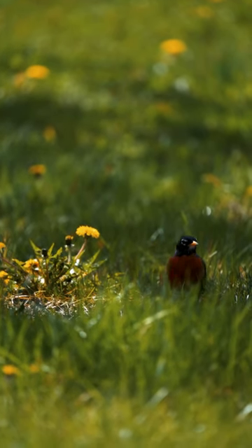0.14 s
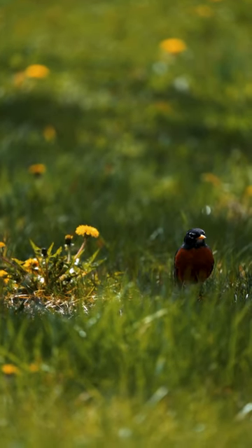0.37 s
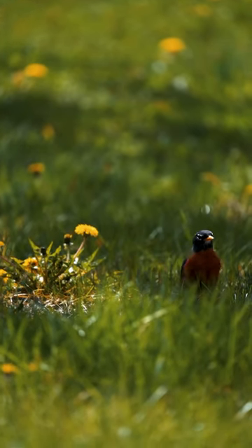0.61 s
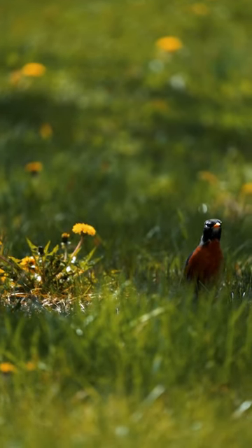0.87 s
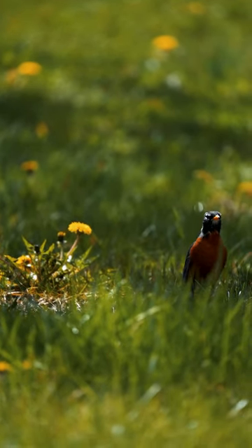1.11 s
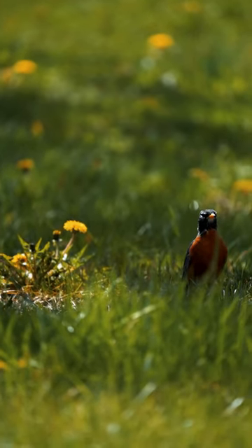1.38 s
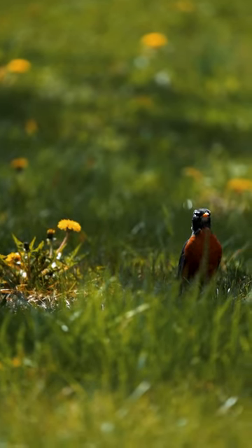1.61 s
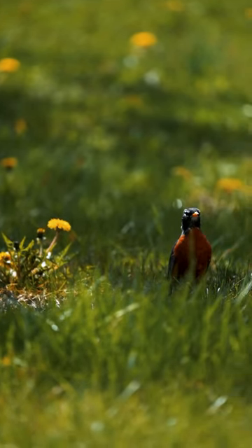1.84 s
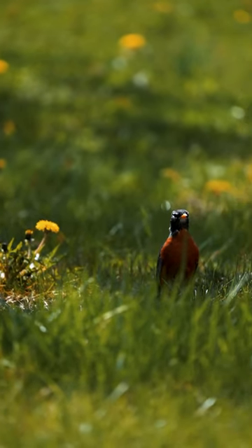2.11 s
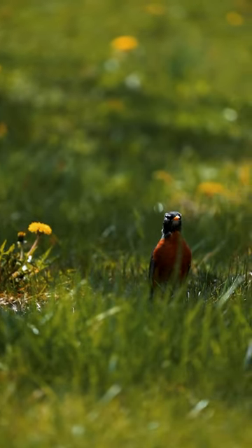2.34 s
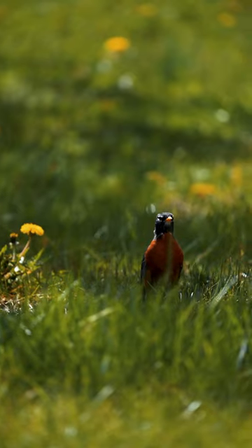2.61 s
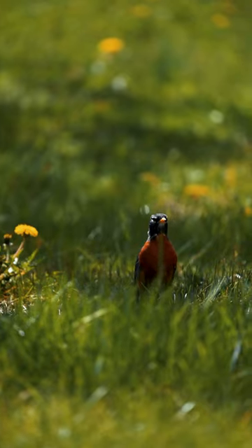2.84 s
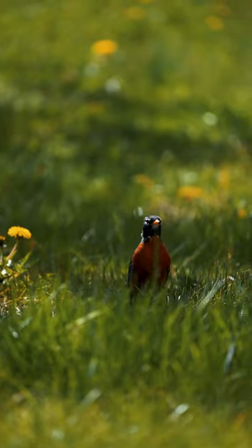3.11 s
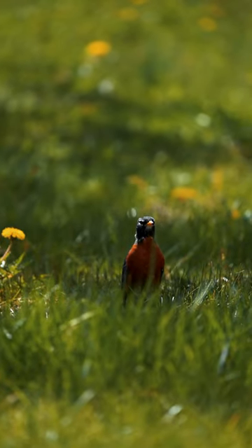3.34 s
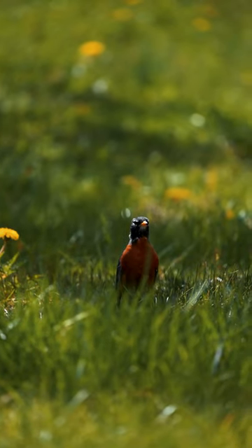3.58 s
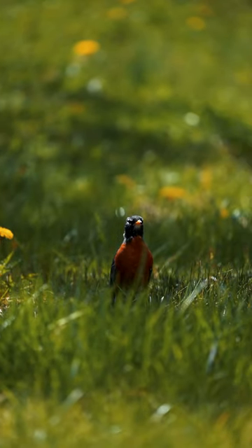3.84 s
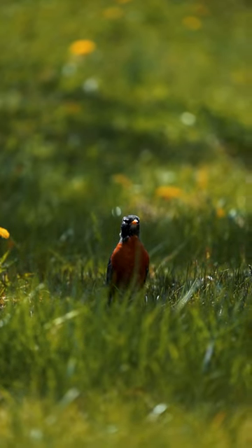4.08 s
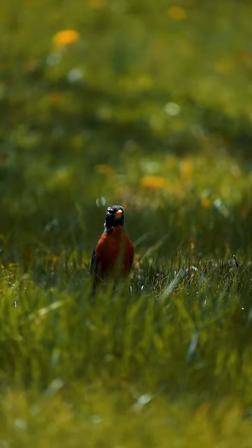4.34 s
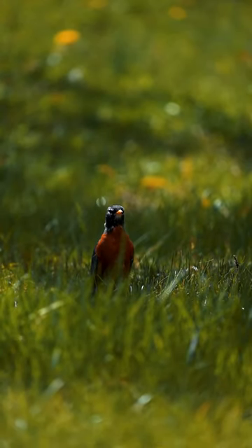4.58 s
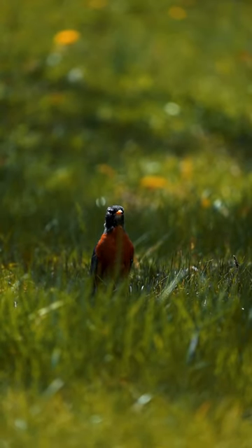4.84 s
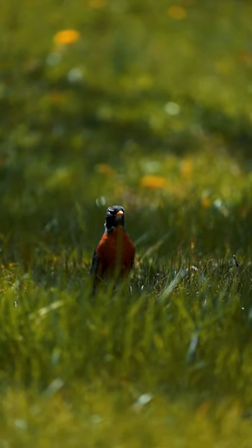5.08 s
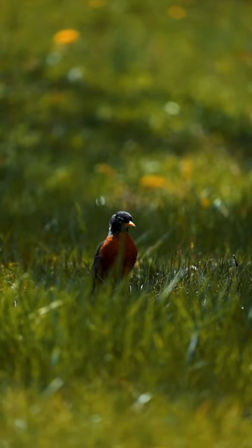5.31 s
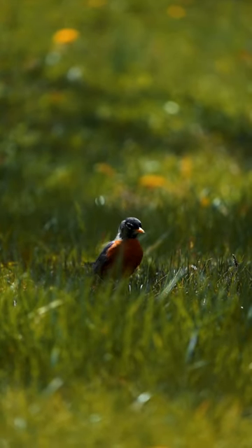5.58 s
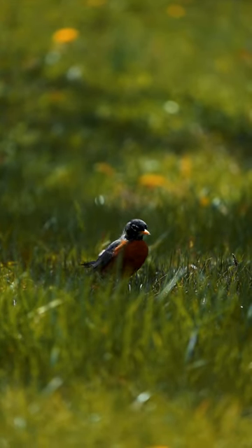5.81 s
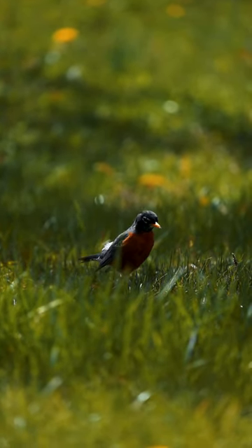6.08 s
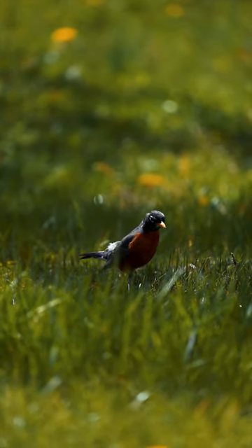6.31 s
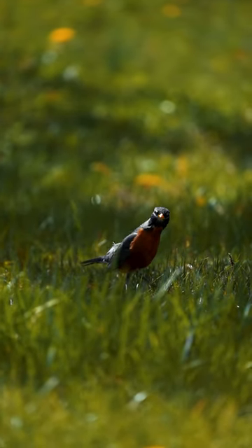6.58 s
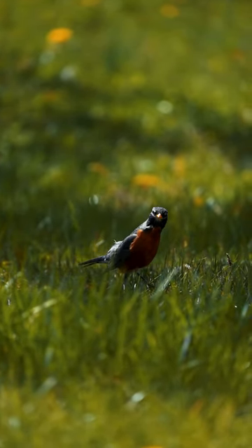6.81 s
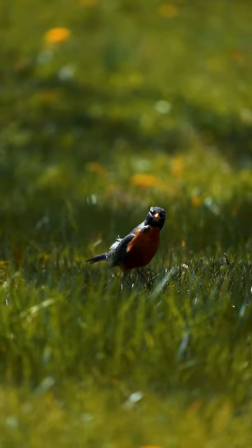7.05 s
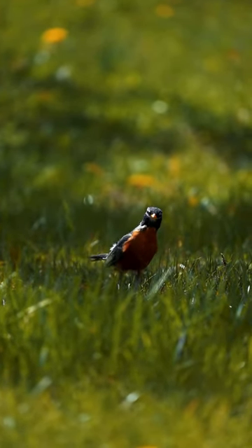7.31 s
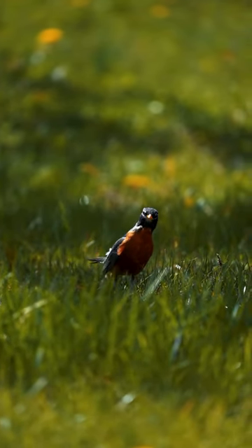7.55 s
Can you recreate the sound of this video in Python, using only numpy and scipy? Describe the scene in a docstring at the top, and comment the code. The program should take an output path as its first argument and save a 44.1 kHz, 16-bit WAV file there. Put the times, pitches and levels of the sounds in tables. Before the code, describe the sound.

Several songbirds chirp, trill and whistle over a quiet lawn, a bright three-part chirp repeating between short thrush-like phrases, then thinning to sparse calls.

```python
"""Songbirds over a lawn, led by a thrush-like singer: arches of pitch shaped by a beak resonance, and trills.
A sparrow-like bird repeats a three-part chirp, near-sine tones in a rasp of resonant noise. Other calls
are slurs, glides, rattling pulses, chopped-noise buzzes, rough burrs and far twitter of random glides.
Trees and walls throw short echoes (sparse random reflections) over rumble and hiss, a hum and a drone."""
import sys
import numpy as np
from scipy import signal
from scipy.io import wavfile
from scipy.ndimage import uniform_filter1d

SR = 44100
rng = np.random.default_rng(int(sys.argv[2]) if len(sys.argv) > 2 else 0)


def wrap_up_sound(samples):
    """Save the sound to the file named by the first command line argument, as 16-bit audio."""
    columns = np.atleast_2d(samples).T
    # keep every value between -1 and 1, then stretch to whole-number steps
    tamed = np.clip(columns, -1, 1)
    steps = np.round(tamed * 32767).astype(np.int16)
    wavfile.write(sys.argv[1], SR, steps)


def attenuation_scalar(level_db):
    """Turn a level in dB into a linear amplitude multiplier (20 dB per decade)."""
    decades = np.asarray(level_db, float) / 20
    return 10 ** decades


N = 338688
THROAT_HZ = 3680  # resonance shared by trills, rattles and the sparrow


def evened(x):
    """Scales to rms 1."""
    return x / np.sqrt(np.mean(x ** 2) + 1e-20)


def wander(count, smooth):
    """Noise of rms 1, averaged over a number of samples."""
    return evened(uniform_filter1d(rng.standard_normal(count), size=smooth))


def add(mix, s, sound):
    """Mixes a sound in at s seconds."""
    part = mix[max(round(s * SR), 0):][:len(sound)]
    part += sound[:len(part)]


def curves(rows):
    """Reads a table at every sample, corners rounded."""
    s, *columns = np.transpose(rows)
    t = np.arange(s[0], s[-1], 1 / SR)
    return [uniform_filter1d(np.interp(t, s, c), size=90, mode="nearest") for c in columns]


def resonate(x, hz, width_hz):
    """A resonance of gain 1, applied twice for steep skirts."""
    turn = np.exp(2j * np.pi * hz * np.arange(len(x)) / SR)
    r = np.exp(-np.pi * abs(width_hz) / SR)
    # shift the resonance to 0 Hz, smooth with a double pole, shift back
    return 2 * (turn * signal.lfilter([(1 - r) ** 2], [1, -2 * r, r * r], x / turn)).real


def syrinx(hz, db, overtones_db=(-40,), rough=0.026):
    """A near sine with soft ends, a few overtones and unsteady level and pitch (rough: rms share of pitch)."""
    count = len(hz)
    phase = 2 * np.pi * np.cumsum(hz * (1 + rough * wander(count, 40))) / SR
    tone = np.sin(phase) + sum(attenuation_scalar(o) * np.sin((k + 2) * phase) for k, o in enumerate(overtones_db))
    edge = np.minimum(np.arange(count), np.arange(count)[::-1]) / (0.0035 * SR)
    flutter_db = 45 * rough * wander(count, 260)
    return attenuation_scalar(db + flutter_db) * tone * np.minimum(edge, 1)


def sing(mix, shape, events, **voice):
    """Repeats one syllable shape, each time at its own level and pitch factor (1 if absent)."""
    hz, db = curves(shape)
    for row in events:
        s, level_db, factor = (*row, 1)[:3]
        add(mix, s, syrinx(hz * factor, db + level_db, **voice))


def thrush(mix):
    """Arches of pitch, loudest where the pitch meets the beak resonance; wide slow rises start softly."""
    # (time of top [s], rise [s], fall [s], foot pitch [Hz], top pitch [Hz], level at beak resonance [dB])
    arch_notes = [(.862, 0.032, 0.0027, 1700, 1900, -45), (1.018, 0.016, 0.015, 1892, 3040, -36),
                  (1.095, 0.021, 0.0078, 1910, 2300, -36.5), (1.222, 0.02, 0.0033, 1964, 2270, -46),
                  (3.172, 0.0053, 0.023, 1550, 2830, -31.5), (3.764, 0.0066, 0.016, 1590, 2200, -34),
                  (3.797, 0.0065, 0.014, 1736, 2236, -33), (3.825, 0.017, 0.012, 1776, 2120, -33),
                  (4.122, 0.018, 0.0184, 1430, 2028, -35.5), (4.171, 0.022, 0.017, 1470, 2075, -33),
                  (4.272, 0.024, 0.012, 1490, 2054, -32.5), (4.313, .011, 0.02, 1450, 2186, -35)]
    beak_hz, under_db_per_khz, over_db_per_khz = 2200, 34, 21
    for s, rise_s, fall_s, foot_hz, top_hz, level_db in arch_notes:
        u = np.r_[np.linspace(-1, 0, round(rise_s * SR)), np.linspace(0, 1, round(fall_s * SR))]
        hz = foot_hz + (top_hz - foot_hz) * np.cos(np.pi / 2 * u)
        loss_db = np.maximum(under_db_per_khz * (beak_hz - hz), over_db_per_khz * (hz - beak_hz)) / 1000
        onset_db = (top_hz - foot_hz) * rise_s * 0.52 * np.minimum(u, 0)
        add(mix, s - rise_s, syrinx(hz, level_db - loss_db + onset_db, (-50,), rough=0.0017))


def trill(stroke, voice, rows):
    """The pitch swings round a gliding middle; the octave is loud only where it meets the throat resonance."""
    rise, rough, point = stroke
    octave_db, throb_db, loudest, done = voice
    throat_width_hz = 290
    middle_hz, swing_hz, db, rate = curves(rows)
    u = (done + np.cumsum(rate) / SR) % 1
    # a quick rise is followed by a steep first drop
    ramp = np.where(u < 1 - rise, (u / (1 - rise)) ** (.5 + rise), (1 - u) / rise)
    hz = middle_hz + swing_hz * (2 * abs(np.cos(np.pi / 2 * ramp)) ** (2 * point) - 1)
    weak_db = np.maximum(2000 - hz, 0) / 30  # the fundamental fades below 2 kHz
    throat_db = octave_db - 10 * np.log10(1 + ((2 * hz - THROAT_HZ) / throat_width_hz) ** 2)
    swell_db = throb_db * (np.cos(2 * np.pi * (u - loudest)) - 1)
    return syrinx(hz, db - weak_db + swell_db, (throat_db + weak_db,), rough)


def trills(mix):
    """Fast repeated pitch swings whose level throbs once a swing."""
    # ((octave level [dB], half throb depth [dB], loudest point in swing [0-1], swings done at start),
    #  rows (time [s], middle pitch [Hz], swing each way [Hz], level [dB], rate [swings/s]));
    # the pitch tops at whole numbers of swings
    trill_table = [ ((0, 3.2, .1, -.17), [(1.33, 2230, 100, -54, 20.2), (1.44, 2340, 295, -56, 20.2),
                   (1.562, 2120, 340, -58, 20.2)]), ((-27, 2.8, .72, -.5), [(1.788, 2870, 200, -53, 24),
                   (2.0, 2530, 233, -53, 18), (2.04, 2494, 302, -47.5, 16)]), ((11.6, 2.1, .41, -.1),
                   [(2.148, 2130, 450, -57, 28), (2.269, 2130, 420, -55.5, 23.8),
                   (2.382, 2070, 420, -60.5, 21.5)]), ((-48, 4.2, .96, -.45), [(3.432, 3350, 680, -65, 90),
                   (3.449, 3090, 380, -42, 80), (3.49, 2693, 240, -34.5, 66),
                   (3.555, 2270, 180, -34.5, 59.5), (3.596, 2063, 66, -33, 59), (3.63, 2052, 12, -37.5, 30),
                   (3.642, 2070, 10, -53, 30)]), ((-38, 2, .32, -.42), [(4.409, 4300, 1370, -57, 78.5),
                   (4.445, 4250, 930, -47, 78.5), (4.468, 4770, 686, -60, 78.5)])]
    # per trill: (rising share of a swing [0-1], pitch roughness [rms share], pointedness of tops [1 up])
    stroke_table = [(.55, .01, 1.6), (.45, .035, 1), (.2, .022, 1.3), (.72, .006, 1), (.5, .01, 1)]
    for stroke, (voice, rows) in zip(stroke_table, trill_table):
        add(mix, rows[0][0], trill(stroke, voice, rows))


def slurs(mix):
    """Longer slurred whistles: near sines along a drawn pitch and level."""
    slur_tables = [
        [(1.615, 3260, -62), (1.654, 3110, -58), (1.687, 3390, -58), (1.712, 3660, -52.5), (1.762, 3440, -63.5)],
        [(3.045, 1590, -65.5), (3.094, 1980, -41.5), (3.108, 2695, -53), (3.123, 2255, -33), (3.147, 1590, -60)],
        [(3.902, 2770, -51), (3.918, 2864, -38.5), (3.943, 2306, -36), (3.97, 2953, -37.5), (4.001, 2076, -39),
         (4.037, 1840, -60)],
        [(2.47, 2950, -67), (2.502, 3800, -51), (2.509, 4250, -44.5), (2.525, 4900, -47), (2.532, 3850, -48),
         (2.55, 3650, -49)],
        [(2.756, 2400, -55), (2.776, 3350, -45.5), (2.796, 4250, -53)],
    ]  # one per whistle: (time [s], pitch [Hz], level [dB])
    slur_rough = [.022, .002, .002, .012, .006]  # per whistle: (pitch roughness [rms share]); the faint far one wavers
    for rows, rough in zip(slur_tables, slur_rough):
        add(mix, rows[0][0], syrinx(*curves(rows), overtones_db=(-48,), rough=rough))


def glides(mix):
    """Straight slides of pitch, a little softer at both ends; some swell to their end."""
    # both: (time [s], length [s], from pitch [Hz], to pitch [Hz], level [dB]); for rises, the level swelled to
    held_notes = [(2.553, 0.024, 5300, 2760, -42.5), (2.625, 0.033, 3100, 4460, -43.5),
                  (2.752, 0.052, 2900, 4900, -60), (3.259, 0.11, 1884, 1930, -41),
                  (3.708, 0.046, 1665, 1740, -51.5), (3.78, 0.065, 3870, 3700, -60.5),
                  (4.096, 0.011, 1910, 2860, -57), (4.187, .02, 3050, 1930, -61.5),
                  (5.375, 0.038, 3870, 3860, -57.5)]
    rising_notes = [(2.46, 0.089, 1794, 2980, -37.5)]
    for table, swell_db_per_s in ((held_notes, 0), (rising_notes, 415)):
        for s, length_s, from_hz, to_hz, level_db in table:
            left_s = np.arange(length_s, 0, -1 / SR)
            hz = to_hz + (from_hz - to_hz) * left_s / length_s
            ends_db = 3 * (2 * left_s / length_s - 1) ** 2
            add(mix, s, syrinx(hz, level_db - swell_db_per_s * left_s - ends_db, rough=0.0064))


def hoarse(hz, db):
    """A sparrow's tone; its overtones come out most where the pitch meets the throat resonance."""
    low_db = -abs(hz - THROAT_HZ) / 40
    return syrinx(hz, db, (low_db / 2 - 27, low_db / 7 - 27, low_db - 42), rough=0.011)


def sparrow_parts(chirps):
    """Lists (shape, time, level, pitch factor) of the soft calls and of each chirp's two arches and hook."""
    # shapes: (time [s], pitch before its factor [Hz], level relative to the event [dB])
    soft_shape, arch_shape, hook_shape = [(0, 3500, -22), (.012, 4500, -5.5), (.025, 4750, -4.5),
                                          (.029, 3900, -6), (.04, 3780, -4), (.062, 3750, -19),
                                          (.073, 3250, -13.5), (.095, 3900, -3.5), (.115, 3120, -9)], [(0, 3680, -8.5), (.008, 4752, 5), (.021, 4857, 2),
                                                        (0.03, 3810, 0.5), (.043, 3675, -6),
                                                        (0.049, 3350, -22)], [(0.0, 3630, -4), (0.012, 3730, -2),
                                                                      (0.024, 4300, 8.5), (0.029, 3705, 4),
                                                                      (0.034, 3620, 0.5),
                                                                      (0.044, 2900, -10.5)]
    soft_events = [(0.613, -47, 0.99), (1.193, -57.5, 1.05), (5.536, -44, 0.98), (7.605, -48, 0.95)]  # (time [s], level [dB], pitch factor)
    second_db, second_lift, hook_lag_s, hook_db = 0.6, 0.0225, .062, -3
    parts = [(soft_shape, *row) for row in soft_events]
    for s, gap_s, db, factor, hook_factor, slant in chirps:
        # the arch top lies between rows 1 and 2: tilt it
        arch = [(t, hz * (1 + slant * ((k == 2) - (k == 1))), top_db)
                for k, (t, hz, top_db) in enumerate(arch_shape)]
        parts += [(arch, s, db, factor),
                  (arch, s + gap_s, db + second_db, factor + second_lift),
                  (hook_shape, s + gap_s + hook_lag_s, db + hook_db, hook_factor)]
    return parts


def sparrow():
    """Grace note, two arches and a hook, or a softer call, in a ragged breathy rasp that starts before the tone."""
    # (time [s], lag of second arch [s], level [dB], pitch factor, hook pitch factor, slant of arch tops [share])
    chirp_events = [(.835, 0.063, -42, 1.006, 1.054, -0.003), (2.53, 0.059, -42, 1.026, 1.01, 0.069),
                    (3.552, 0.069, -43.5, 1.038, 1.07, 0.0092), (5.113, 0.066, -43, 1.028, 1.144, 0.05),
                    (5.784, 0.067, -43, 1.064, 0.99, 0.027), (6.212, 0.058, -43, 1.03, 1.02, 0.017)]
    grace_shape = [(0, 3710, -24), (0.014, 4920, 1)]  # (time [s], pitch [Hz], level relative to the chirp [dB])
    rasp_bands = [(4300, 1200, -16.5, 0.018), (11150, 2400, -29.5, 0.012)]  # (centre [Hz], width [Hz], level relative to the breath [dB], lag [s])
    out, breath = np.zeros(N), np.zeros(N)
    for shape, s, level_db, factor in sparrow_parts(chirp_events):
        hz, db = curves(shape)
        add(out, s, hoarse(hz * factor, db + level_db))
        add(breath, s - .075, attenuation_scalar(level_db) * np.hanning(len(hz) + round(.1 * SR)))
    sing(out, grace_shape, [(s - .013, db) for s, _, db, *_ in chirp_events])
    for hz, width_hz, db, lag_s in rasp_bands:
        ragged_db = 5 * wander(N, 900)  # each band flares on its own
        hiss = evened(resonate(resonate(rng.standard_normal(N), hz, width_hz), hz, width_hz))
        late_breath = np.r_[np.zeros(round(abs(lag_s) * SR)), breath][:N]
        out += late_breath * attenuation_scalar(db) * evened(attenuation_scalar(ragged_db) * hiss)
    squabble(out)
    return out + attenuation_scalar(-20) * breath * evened(scratches(400, 3600, 3800, .04))


def squabble(mix):
    """A jumble of short scratchy calls under one swell."""
    squabble_row = (.6, 0.29, -61)  # (time [s], length [s], level before the swell window [dB])
    s, length_s, db = squabble_row
    jumble = scratches(300, 2100, 4800, .02)[:round(length_s * SR)]
    add(mix, s, attenuation_scalar(db) * evened(jumble) * np.hanning(len(jumble)) ** .5)


def rattles(mix):
    """Slowing, uneven pulse trains; overtones 5-9 show as a stack of falling lines round the throat."""
    start_s, gap_s, count, level_db = 1.337, .0525, 5, -54
    for k in range(count):
        left = np.linspace(1, 0, round(.034 * SR))
        uneven = 1 + .008 * wander(len(left), 60)
        turns = np.cumsum(rng.uniform(.94, 1.06) * (440 + 120 * left ** 3) * uneven) / SR
        pulses = sum(np.cos(2 * np.pi * h * turns) for h in range(5, 10))
        sound = evened(resonate(pulses, THROAT_HZ, 670) + 0.41 * pulses)
        sound = sound * signal.windows.tukey(len(turns), .6)
        add(mix, start_s + k * gap_s, attenuation_scalar(level_db + 2 * rng.standard_normal()) * sound)


def buzzes(mix):
    """Noise in a narrow resonance, chopped by a throb."""
    # (time [s], length [s], centre [Hz], rms before end tapers [dB], rate [throbs/s])
    buzz_table = [(0.856, 0.054, 2210, -51, 70), (1.223, 0.052, 5500, -67, 69),
                  (2.748, 0.075, 710, -69, 24), (2.099, 0.12, 2640, -58, 61),
                  (2.349, 0.13, 2700, -60.5, 51), (2.884, 0.61, 2590, -63, 67),
                  (5.578, 0.064, 5500, -60.5, 92)]
    for s, length_s, hz, db, rate in buzz_table:
        t = np.arange(round(length_s * SR)) / SR
        chop = .35 + np.sin(np.pi * rate * t) ** 2
        noise = evened(resonate(rng.standard_normal(len(t)), hz, 370) * chop)
        add(mix, s, attenuation_scalar(db) * noise * signal.windows.tukey(len(t), .3))


def burrs(mix):
    """Two rough tones at once, each throbbing fast and unevenly."""
    burr_table = [(.02, 0.032, -59, -67), (.049, 0.024, -57, -64), (.093, 0.02, -58, -66),
                  (.119, 0.03, -58, -62), (1.023, 0.041, -49, -61), (1.101, 0.047, -64, -50),
                  (1.219, 0.038, -55.5, -54)]  # (time [s], length [s], rms of low tone [dB], rms of high tone [dB])
    burr_hz = (2240, 2830)  # (low tone [Hz], high tone [Hz])
    throbs_per_s = 134
    for s, length_s, *levels_db in burr_table:
        for hz, db in zip(burr_hz, levels_db):
            t = np.arange(round(length_s * SR)) / SR
            beats = throbs_per_s * t + .3 * wander(len(t), 300)
            tone = syrinx(hz + 0 * t, 0, rough=0.052)
            add(mix, s, attenuation_scalar(db) * evened(tone * (.6 + np.sin(np.pi * beats) ** 2)))


def peeps(mix):
    """Short near sines of level pitch."""
    peep_table = [(.535, 2310, -64.5), (.578, 2380, -66.5), (0.626, 2420, -69), (.733, 5050, -62),
                  (.578, 5000, -62), (2.843, 5090, -58), (2.883, 5050, -56), (6.95, 2105, -68),
                  (7.37, 2180, -66.5)]  # (time [s], pitch [Hz], level [dB])
    for s, hz, db in peep_table:
        add(mix, s, syrinx(np.full(round(0.026 * SR), hz), db, rough=0.017))


def small_calls(mix):
    """Tsips, flicks and falling calls: near sines along fixed pitch shapes."""
    # shapes: (time [s], pitch before any factor [Hz], level relative to the event [dB])
    tsip_shape, flick_shape, drop_shape = [(0.0, 4170, 8), (0.004, 3210, -3), (0.022, 3520, 1),
                                           (0.039, 2610, -2.5)], [(0, 2520, 6), (.016, 3200, -9)], [(0, 6930, -13), (0.016, 4920, -8),
                                                                        (.065, 4730, -3.5)]
    # events: (time [s], level [dB])
    tsip_events, flick_events, drop_events = [(.04, -58.5), (4.215, -65.5), (4.33, -63.5), (7.377, -62.5),
                                              (7.477, -62), (7.579, -61)], [(.441, -63), (0.495, -64), (.522, -62),
                                                             (0.567, -61)], [(5.99, -61.5), (6.695, -57.5)]
    step_s, step_factor, step_db = 0.057, 0.83, -4  # a lower, fainter drop follows each
    second_drops = [(s + step_s, db + step_db, step_factor) for s, db in drop_events]
    sing(mix, tsip_shape, tsip_events, rough=0.024)
    sing(mix, flick_shape, flick_events, rough=0.011)
    sing(mix, drop_shape, drop_events + second_drops, rough=.018)


def caws(mix):
    """Both halves of the syrinx sound, a little apart in pitch, with a strong octave."""
    caw_shape = [(0, 1115, -19), (.04, 1465, -10), (0.057, 1743, -0.5), (.068, 1750, -3), (.082, 1400, -8),
                 (0.118, 1330, -14)]  # (time [s], pitch before its factor [Hz], level relative to the event [dB])
    caw_events = [(2.332, -67.5), (5.664, -68), (6.071, -68.5), (7.019, -65.5)]  # (time [s], level [dB])
    for factor in (1, .87):
        sing(mix, caw_shape, [(s, db, factor) for s, db in caw_events], overtones_db=(10, -6), rough=.035)


def chorus():
    """All singers but the sparrow and the far twitter."""
    out = np.zeros(N)
    for singer in (thrush, trills, slurs, glides, rattles, buzzes, burrs, peeps, small_calls, caws):
        singer(out)
    return out


def scratches(per_s, low_hz, span_hz, rough):
    """Short glides at random moments and pitches: sparse makes far twitter, dense a scratchy jumble or rasp."""
    out = np.zeros(N)
    for s, pitch, slide, size in rng.random((round(per_s * N / SR), 4)):
        hz = (low_hz + span_hz * pitch ** 2) * np.linspace(1, .75 + .4 * slide, round(.028 * SR))
        add(out, s * N / SR, syrinx(hz, -10 * size, (), rough) * np.hanning(len(hz)))
    return out


def echoes(x, t60_s=0.32, first_s=0.0091):
    """Sparse reflections of random sign from trees and walls, dying away."""
    at = np.arange(round(first_s * SR), SR // 2, 60)
    taps = np.zeros(SR // 2 + 60)
    signs = rng.choice([-1., 1.], len(at))
    taps[at + rng.integers(0, 60, len(at))] = signs * attenuation_scalar(-60 * at / SR / t60_s)
    return signal.fftconvolve(x, taps / np.linalg.norm(taps))[:N]


def air():
    """Distant rumble and hiss: coloured noise in slowly drifting patches."""
    air_colour = [(45, -24), (76, -6.5), (110, -6), (210, -11), (540, -13.5), (850, -19), (1800, -22.5),
                  (4070, -21.5), (6000, -29.5), (15700, -35)]  # (frequency [Hz], relative density [dB])
    level_db, patch_db = -68.5, 2.44  # both rms
    frames, hz = N // 256 + 5, np.fft.rfftfreq(1024, 1 / SR)
    a, b, patches = rng.standard_normal((frames, 513, 3)).T
    patches = uniform_filter1d(patches, size=10, axis=0)
    patches = evened(uniform_filter1d(patches, size=30, axis=1))
    f, db = np.transpose(air_colour)
    colour_db = np.interp(np.log(hz + 1), np.log(f + 1), db)
    z = (a + 1j * b) * attenuation_scalar(colour_db[:, None] + patch_db * patches)
    return attenuation_scalar(level_db) * evened(signal.istft(z, nperseg=1024, noverlap=768)[1][:N])


def drone(level_db=-76, gone_s=3.37):
    """A distant broad drone (resonant noise), fading over the second before gone_s, over a low wavering hum."""
    hum = attenuation_scalar(-79.5) * evened(resonate(rng.standard_normal(N), 77.9, 18))
    fade = np.clip(gone_s - np.arange(N) / SR, 0, 1)
    return hum + attenuation_scalar(level_db) * fade * evened(resonate(rng.standard_normal(N), 600, 366))


def scene():
    """Birds, their echoes (one near wall answers the sparrow at once) and the air."""
    others, near = chorus(), sparrow()
    far = attenuation_scalar(-88.5) * scratches(60, 2600, 2600, 0.026)
    # above 7 kHz the sparrow arrives mostly scattered
    overtones = signal.sosfilt(signal.butter(6, 7000, "high", fs=SR, output="sos"), near)
    near = signal.sosfilt(signal.butter(6, 7000, fs=SR, output="sos"), near) + attenuation_scalar(-12) * overtones
    tails = attenuation_scalar(-4.0) * echoes(overtones, t60_s=0.11)
    tails += attenuation_scalar(-8.5) * echoes(near)
    tails += attenuation_scalar(-13.0) * np.roll(near, round(.0085 * SR))  # the near wall
    tails += attenuation_scalar(-12.5) * echoes(others, t60_s=0.22)
    tails += attenuation_scalar(18.5) * echoes(far, t60_s=0.2)
    return (near + others + far + tails + air() + drone())[None]


def low_pass(x):
    """Removes everything above the highest recorded frequency."""
    return signal.sosfilt(signal.butter(12, 15820, fs=SR, output="sos"), x)


def record(dry):
    """Delivers the finished mix."""
    return low_pass(dry)


dry = scene()
out = record(dry)
wrap_up_sound(out)
```